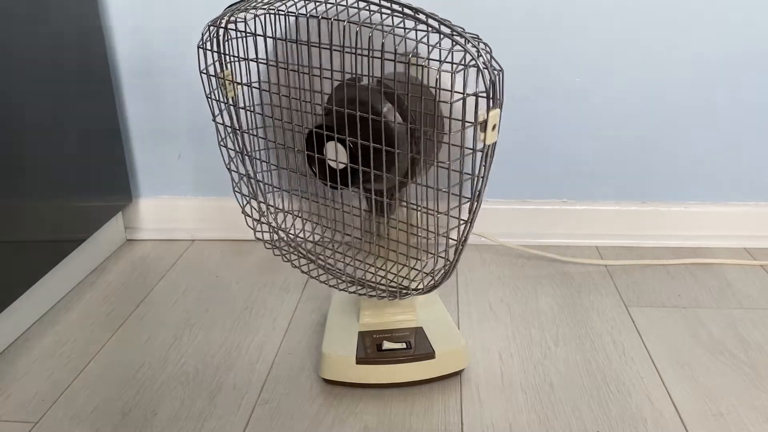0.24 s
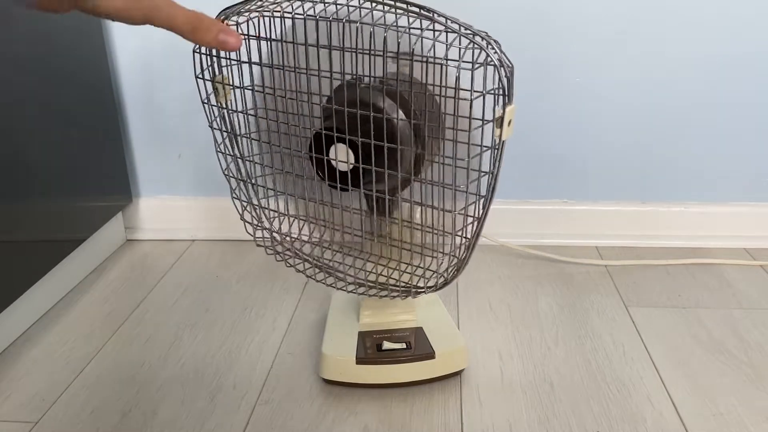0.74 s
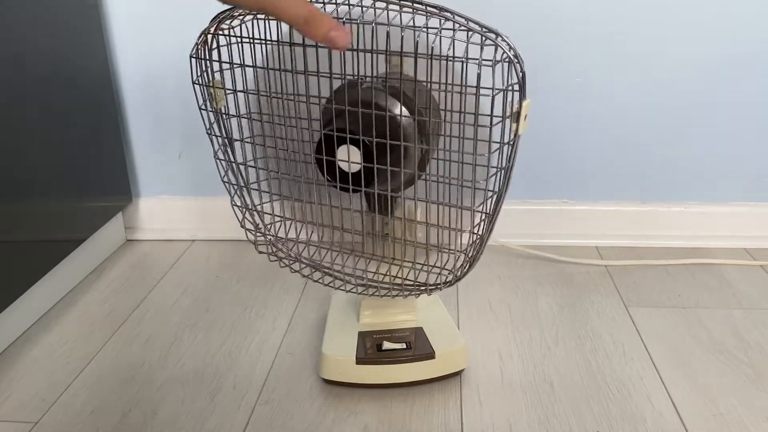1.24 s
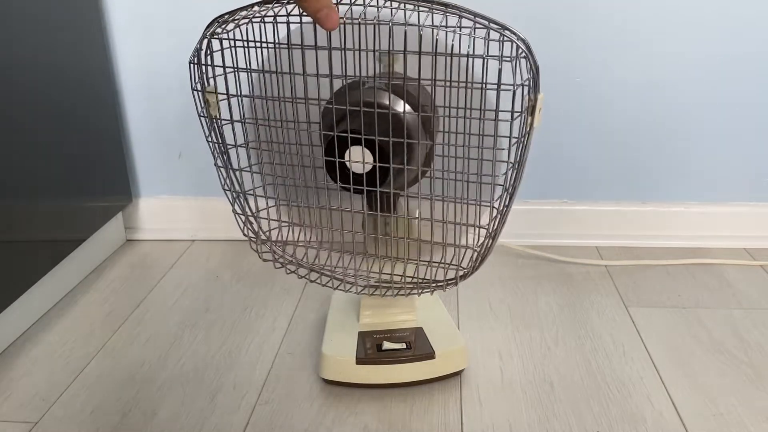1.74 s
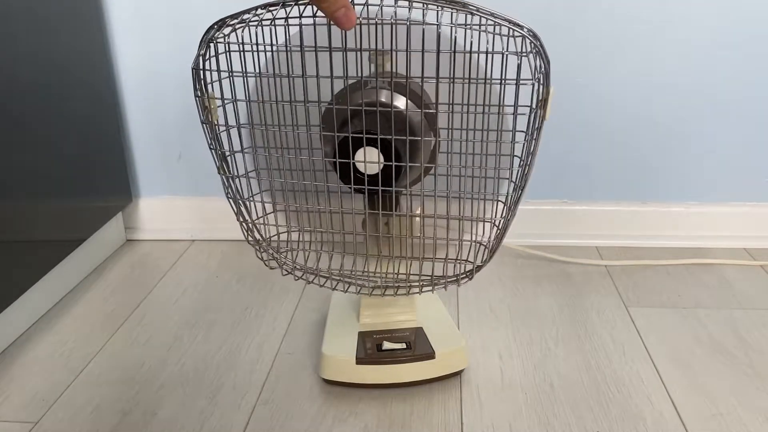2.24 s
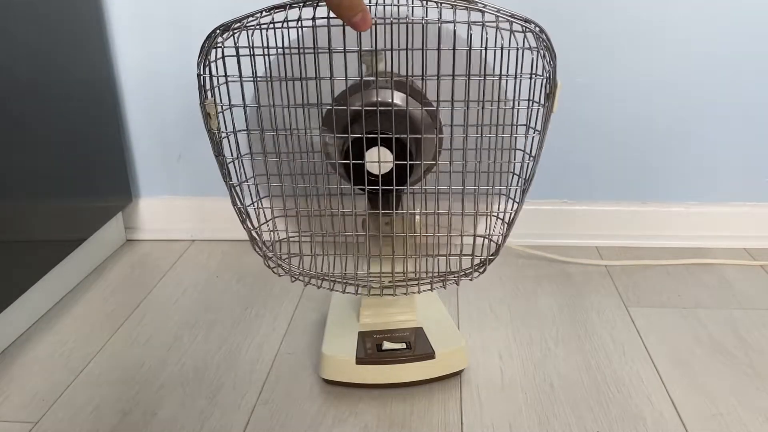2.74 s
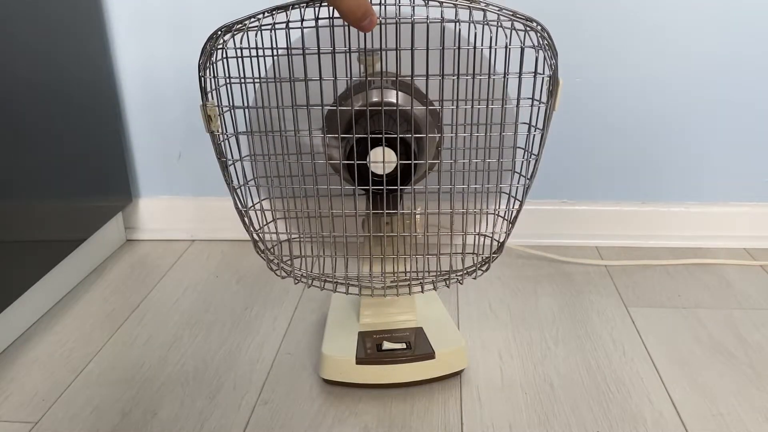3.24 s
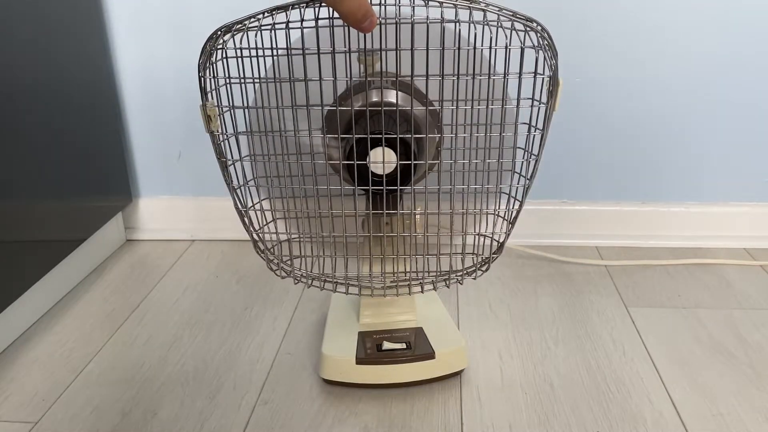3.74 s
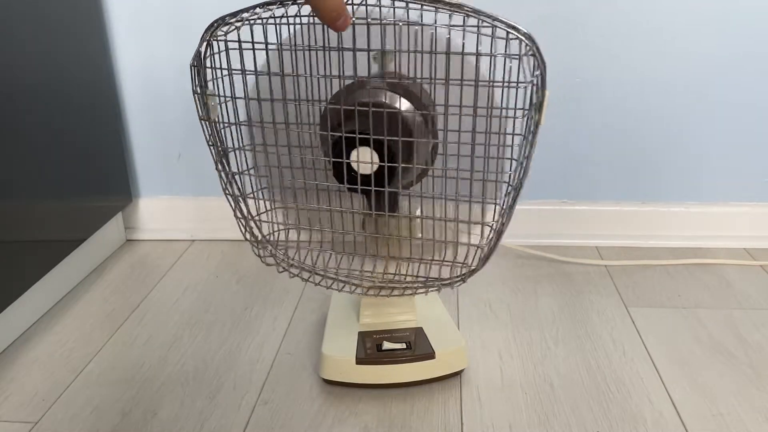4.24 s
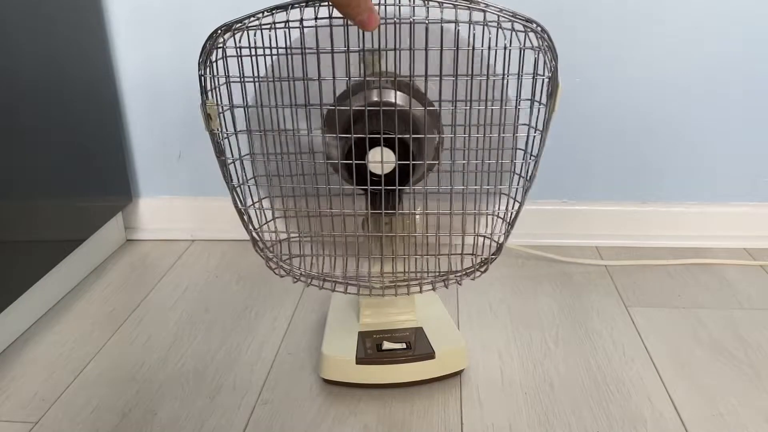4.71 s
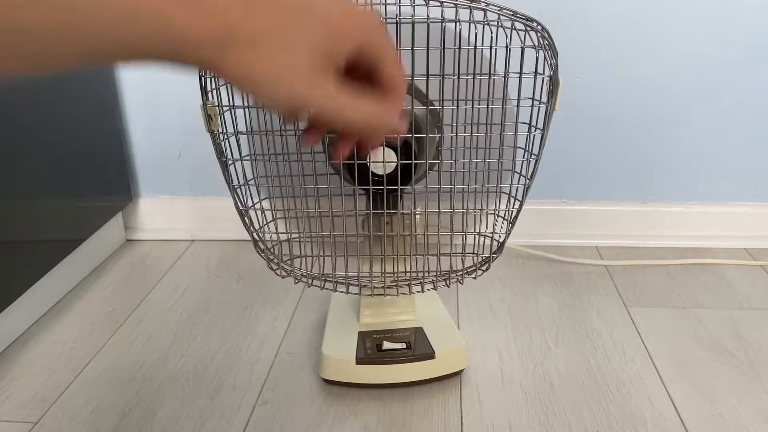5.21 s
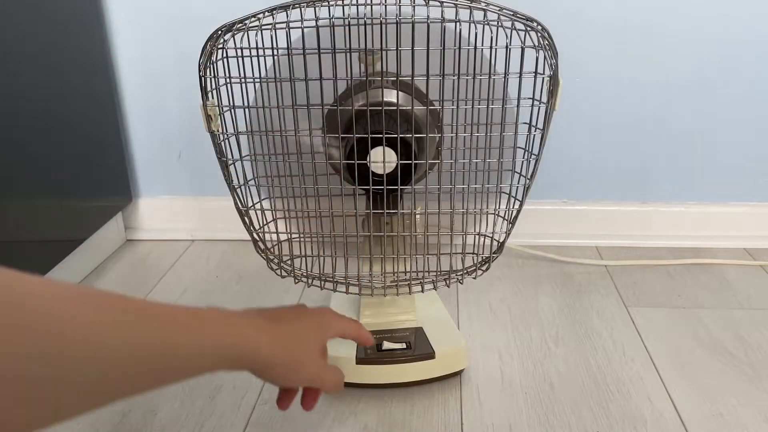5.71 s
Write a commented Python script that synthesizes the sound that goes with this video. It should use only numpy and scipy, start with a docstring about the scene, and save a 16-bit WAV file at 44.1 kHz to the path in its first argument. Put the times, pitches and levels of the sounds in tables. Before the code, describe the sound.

An old electric desk fan runs without stopping for about six seconds, heard close by a stereo phone on a laminate floor in a room. A steady motor hum near 200 Hz, with weaker 100 Hz, sits under a thin whine around 450 Hz that trembles and briefly dips, more raggedly later. Soft, mid-heavy air rush pulses very slightly with the fast blades, about 62 beats a second, and shifts colour as the head turns. Low buffeting grows somewhat after 3 seconds. At 3.4 a deep, dull thump travels through the floor, falling in pitch with a short boomy echo, trailed by weaker bumps until 3.9. A very faint wire-cage tick comes at 3.7, a clearer one at 4.95. Softer thuds follow around 5.1 and 5.45, then a strong, crowded cluster of knocks from 5.74 to 5.94 while the fan keeps running. The fan leans slightly left.

```python
"""An old desk fan runs on a laminate floor in front of a phone with two microphones.
From the start its induction motor hums at mains multiples and whines at its rotor slots, as sums of sines;
three blades beat, filtered noise rushes and buffets, and the head swings to and fro, mostly towards the
front later. Then come soft blows through the floor boards, as thuds that fall in pitch with a scattered
echo, and among them two ticks of the cage, as short coloured noise bursts."""
import sys
import numpy as np
from scipy import signal
from scipy.fft import rfft, irfft, next_fast_len
from scipy.io import wavfile
from scipy.ndimage import uniform_filter1d

SR = 44100
rng = np.random.default_rng(int(sys.argv[2]) if len(sys.argv) > 2 else 0)


def materialize(psi):
    """Save the field psi as 16-bit PCM at rate SR to the path in sys.argv[1].

    A 1-D psi becomes a single channel; in a 2-D psi each row is a channel.
    """
    bounded = np.clip(np.atleast_2d(psi).T, -1, 1)
    quanta = np.round(bounded * 32767).astype(np.int16)
    wavfile.write(sys.argv[1], SR, quanta)


N = 263261
T = np.arange(N) / SR
SIZE = next_fast_len(N + SR)  # transform length, with a second to spare
HZ = np.maximum(np.arange(SIZE // 2 + 1) * SR / SIZE, 1.)
BLADES = 3


def undb(db):
    """Decibel law: 20 dB is a tenfold amplitude."""
    return 10 ** (np.asarray(db) / 20)


def curve(table):
    """Linear interpolation of a table's columns over time."""
    s, *columns = np.transpose(table)
    return [np.interp(T, s, column) for column in columns]


def along(table, column=1):
    """Interpolation of a table's column over the logarithm of frequency."""
    table = np.array(table)
    return np.interp(np.log(HZ), np.log(table[:, 0]), table[:, column])


def between(pair, facing):
    """Linear blend from head turned away to head facing the phone."""
    return pair[0] + (pair[1] - pair[0]) * facing


def walk(rate_hz):
    """Smoothed random modulation: levels held 1 / rate_hz and slewed twice; spread near 1."""
    hold = int(SR / rate_hz)
    steps = np.repeat(rng.standard_normal(N // hold + 1), hold)
    slewed = uniform_filter1d(uniform_filter1d(steps, hold), hold)
    return np.sqrt(2) * slewed[:N]


def tone(turns, db, pan_db, lag):
    """Level and phase difference between microphones: a sine pan_db louder and lag radians ahead at left."""
    left = undb(db + pan_db / 2) * np.sin(2 * np.pi * turns + lag / 2)
    right = undb(db - pan_db / 2) * np.sin(2 * np.pi * turns - lag / 2)
    return np.sqrt(2) * np.array([left, right])  # db is an rms level


# Magnetic hum lines: mains_multiple, shaft_multiple, level_db (relative to the hum level), flutter_db
HUM_LINES = [(2, 0, -11, 1), (4, 0, -0.5, 0.68), (2, -1, -30, 0.5), (2, 1, -19, 2.5), (4, -1, -29.5, 3.5),
             (4, 1, -30, 6.5)]
# Hum level over time: start_s, level_db
HUM_LEVEL = [(0, -41), (2, -38.5), (4.2, -39.5), (5.1, -42), (5.45, -39.5), (5.97, -40)]
# Rotor whine before its fades and flutter: start_s, level_db
WHINE_LEVEL = [(0.0, -52), (0.2, -47), (0.6, -49), (1.9, -47.5), (2.4, -51), (2.84, -47.5), (3.2, -53),
               (3.5, -54), (3.8, -53), (4.16, -52), (4.6, -48.5), (5.15, -49), (5.35, -49), (5.85, -48.5),
               (5.97, -45.5)]
# Short irregular dips in the whine's level: centre_s, depth_db, width_s
WHINE_DIPS = [(2.59, -5.5, 0.028), (2.929, -11.5, 0.048), (3.17, -8, 0.026), (3.425, -10, 0.026),
              (3.895, -11, .015), (4.3, -19, 0.039), (4.68, -8, 0.021), (4.76, -6, 0.016), (4.82, 0, 0.014),
              (5.055, -8, 0.015), (5.255, -1, .02), (4.96, -13, 0.046), (5.14, -17, 0.023),
              (5.32, -5, 0.041), (5.44, -8, 0.038), (5.56, -10, 0.013), (5.71, -6, 0.033),
              (5.8, -19, 0.016), (5.925, -10, 0.012)]
MAINS_HZ, SLOTS = 49.89, 17
WHINE_FADES_DB = (0.5, 2)  # depth of its short fades: turned away, facing


def motor(shaft, facing):
    """Magnetic forces hum with shaft sidebands; slot passing sings alone and above twice the mains."""
    (hum_db,), (whine_db,) = curve(HUM_LEVEL), curve(WHINE_LEVEL)
    hum = 0
    for mains_multiple, shaft_multiple, level_db, flutter_db in HUM_LINES:
        turns = mains_multiple * MAINS_HZ * T + shaft_multiple * shaft + rng.random()
        hum = hum + tone(turns, hum_db + level_db + flutter_db * walk(12), 3.0, 0.069)
    slots = SLOTS * shaft + 0.016 * walk(19) + 0.047 * walk(45)  # the pitch of the whine trembles
    # Squaring makes the short fades deep now and then
    fades_db = between(WHINE_FADES_DB, facing) * (1 - walk(26) ** 2)
    for centre_s, depth_db, width_s in WHINE_DIPS:
        fades_db = fades_db + depth_db * np.exp(-((T - centre_s) / width_s) ** 2)
    flutter_db = 1.63 * walk(22) + 1.8 * walk(50)
    whine = tone(2 * MAINS_HZ * T + slots, whine_db + fades_db + flutter_db, 3.3, -0.16)
    return hum + whine + tone(slots, -67 + 3 * walk(15), 12.0, 2.8)


# Blade overtones: multiple, level_db (before swells, fades and the turn of the head), flutter_db,
# right_lag_rad
BLADE_OVERTONES = [(2, -68, 3, 0.64), (3, -60, 2.5, 0.12), (4, -62, 1, 0.26), (5, -64.5, 2, 0.97)]
# Overtones that come and go: start_s, fourth_multiple_db, fifth_multiple_db
OVERTONE_SWELLS = [(0, -7, 2), (.3, 4, -2), (.6, 1, -2), (.9, 4, -2), (1.15, 2, 0.5), (1.6, -1, 8),
                   (1.85, -9, 3), (2.6, -3.5, -2), (3.05, -1, 6), (3.3, -3, -10), (3.8, -6, 5),
                   (4.2, -4, -5), (4.8, -11, -4), (5.02, -4, 8), (5.2, -7, -4), (5.5, 4, -11),
                   (5.7, -12, 1)]
BEAT_DB, OVERTONES_DB = (-62, -52), (2, -3)  # turned away, facing
OVERTONE_FADES_DB = 3.5


def blades(shaft, facing):
    """Blade passing makes a harmonic series; facing lifts its beat, lowers its overtones; turbulence shakes it."""
    beat_turns = BLADES * shaft + 0.041 * walk(2.5)
    out = tone(beat_turns, between(BEAT_DB, facing) + 3.0 * walk(9), 1.9, 0.094)
    swells_db = [0, 0] + curve(OVERTONE_SWELLS)
    for (multiple, level_db, flutter_db, right_lag), swell_db in zip(BLADE_OVERTONES, swells_db):
        turns = multiple * BLADES * shaft + rng.random() + 0.012 * multiple * walk(15)
        db = level_db + swell_db + between(OVERTONES_DB, facing) + flutter_db * walk(10)
        fades_db = OVERTONE_FADES_DB * (1 - walk(8) ** 2)
        out = out + tone(turns, db + fades_db, 2.3, right_lag)
    return out


# Air noise colour common to both microphones: frequency_hz, relative_density_db (per Hz)
RUSH_MID = [(60, -11.5), (150, 1), (260, 3), (400, 0.5), (1300, -3), (2300, -13), (4500, -18.5),
            (6800, -26), (7500, -32), (7900, -72), (8800, -48), (9300, -34), (11500, -37), (14000, -51)]
# Air noise colour opposite in the two microphones: frequency_hz, relative_density_db (per Hz)
RUSH_SIDE = [(60, -16), (150, -10), (300, -16), (600, -6), (1900, -15.5), (3500, -24.5), (4800, -24.5),
             (5900, -33.5), (7700, -24.5), (10200, -36.5), (10700, -63.5), (12700, -59.5), (13300, -42.5),
             (15500, -48)]
# Share of the opposite part that follows the common part, as the fan stands nearer the left microphone:
# frequency_hz, in_phase_share (fraction), quarter_cycle_ahead_share (fraction)
LEAN = [(60, 0.29, 0.045), (300, 0.28, -.05), (1000, .34, -.05), (2000, 0.36, .25), (3000, 0.47, .45),
        (5000, 0.24, .45), (7500, 0.1, -0.27)]
# Narrow peaks and dips in the air noise, before flutter: centre_hz, width_hz, gain_db,
# facing_db (added to the peak or dip when the head faces the phone)
PEAKS_AND_DIPS = [(517, 81, 2.5, 0), (808, 16, 5.5, -1), (1113, 26, 6, 3), (1277, 45, 5, 4),
                  (1583, 170, 4.5, -3.5), (1750, 110, -7.5, -7.5), (1870, 88, -0.5, 7.5),
                  (2540, 830, 2, 2.5), (1963, 70, 7.5, -5), (2126, 90, 6, 0)]
# Rush level before the blade pulse: start_s, level_db, treble_lift_db
RUSH_LEVEL = [(0, -51.5, 2), (.7, -50.5, 1), (2.2, -50.5, 0.5), (3.2, -51, 1), (4.4, -50.5, 2.5),
              (5.55, -50, -0.5), (5.85, -51.5, 6), (5.97, -50.5, 4.5)]
TREBLE_HZ = 4300


def rush(shaft, facing):
    """Turbulence is broadband noise: half-octave bands, peaks and dips flicker; all pulse with the blades."""
    common, separate = (rfft(rng.standard_normal(SIZE)) for _ in range(2))
    lean = along(LEAN) + 1j * along(LEAN, column=2)
    unshared = np.sqrt(np.clip(1 - np.abs(lean) ** 2, 0, 1))
    mid = common * undb(along(RUSH_MID))
    side = (lean * common + unshared * separate) * undb(along(RUSH_SIDE))
    stereo = np.array([mid + side, mid - side])

    def through(gain):
        """Linear filtering: the air noise shaped by a gain over frequency."""
        return irfft(gain * stereo, SIZE)[:, :N]

    rush_db, treble_db = curve(RUSH_LEVEL)
    out = 0
    for centre_hz in 2 ** np.arange(5, 14.6, 1 / 2):
        band = np.cos(np.pi / 2 * np.clip(2 * np.log2(HZ / centre_hz), -1, 1)) ** 2
        lift_db = treble_db * np.exp(-np.log2(centre_hz / TREBLE_HZ) ** 2)
        flicker_db = 1.0 * walk(13) + 0.58 * walk(4.1)
        out = out + undb(flicker_db + lift_db) * through(band)
    for centre_hz, width_hz, gain_db, facing_db in PEAKS_AND_DIPS:
        # A gain below 0 dB is subtracted, which leaves a dip
        change = (undb(gain_db) - 1) / (1 + (2 * (HZ - centre_hz) / width_hz) ** 2)
        flutter_db = 1.4 * walk(4.5) + 2.8 * walk(19) + 1.6 * walk(60)
        out = out + undb(facing_db * facing + flutter_db) * through(change)
    pulse = 1 + 0.045 * np.sin(2 * np.pi * BLADES * shaft) + 0.026 * np.sin(2 * np.pi * shaft)
    return out * pulse * undb(rush_db) / np.std(out)


# Colour of the low buffeting: frequency_hz, relative_density_db (per Hz)
RUMBLE_COLOUR = [(20, -23), (35, -3.5), (55, 0), (80, 1.5), (130, -4), (200, -19.5), (400, -77.5)]
# Low buffeting level over time, before its flutter: start_s, level_db
RUMBLE_LEVEL = [(0, -60.5), (1, -59.5), (2, -59.5), (3, -55.5), (3.7, -54), (4.3, -57), (5, -54),
                (5.97, -53)]


def draught():
    """Pressure fluctuation: the air stream buffets floor and phone with partly shared low noise."""
    colour = undb(along(RUMBLE_COLOUR))
    both, left, right = (irfft(rfft(rng.standard_normal(SIZE)) * colour, SIZE)[:N] for _ in range(3))
    out = np.array([both + 0.3 * left, both + 0.26 * right])
    (rumble_db,) = curve(RUMBLE_LEVEL)
    return out * undb(rumble_db + 3.1 * walk(10)) / np.std(out)


LOW_SPREAD = 1.42  # the colour of a blow spreads this much wider below its centre
EDGE_HZ = 400


def thud(arrival_s, peak_db, centre_hz, width_octaves, lag_s, edge_db):
    """Group delay: each frequency arrives at arrival_s - lag_s + lag_s * 100 / Hz, high before low."""
    width = width_octaves * np.where(HZ < centre_hz, LOW_SPREAD, 1)
    colour = np.exp(-.5 * (np.log2(HZ / centre_hz) / width) ** 2)
    # The hard edge of the contact
    colour += undb(edge_db) / (1 + (HZ / EDGE_HZ) ** 6) / (1 + (centre_hz / HZ) ** 4)
    turns = HZ * (arrival_s - lag_s) + 100 * lag_s * np.log(HZ / 100)
    wave = -colour * np.exp(-2j * np.pi * turns)
    return wave * undb(peak_db) / np.abs(irfft(wave, SIZE)).max()


# Floor blows before their echo: arrival_s (of 100 Hz), peak_db, centre_hz, width_octaves,
# lag_s (of 100 Hz behind the highest pitches), edge_db (hard edge relative to the thud's colour)
BLOWS = [(3.417, -32, 220, 0.3, 0.004, -25), (3.4241, -31, 420, 0.4, 0.00084, -27),
         (3.4305, -17, 68, 0.94, 0.0088, -34), (3.468, -28, 54.8, 0.36, 0.0078, -30),
         (3.506, -33.5, 52.4, 0.51, 0.0089, -31), (3.543, -36, 71, 0.63, 0.015, -34),
         (3.64, -44.5, 60, 0.5, 0.0083, -32), (3.715, -40, 70, 0.46, 0.013, -31),
         (3.89, -38, 75, 0.34, 0.014, -30), (5.075, -27.5, 78, 0.47, 0.0108, -35),
         (5.102, -32.5, 77, 0.6, 0.0098, -37), (5.137, -26, 84.7, 0.51, 0.0097, -24),
         (5.418, -33, 96.5, .35, 0.014, -42), (5.445, -36, 54.7, 0.31, 0.01, -40),
         (5.503, -36, 80.5, 0.41, 0.011, -30), (5.736, -17, 156, 0.26, 0.0206, -23),
         (5.753, -26.5, 84.4, 0.3, 0.0148, -28), (5.767, -26, 192, 0.4, 0.0106, -15),
         (5.795, -21.5, 70, 0.78, 0.014, -20), (5.818, -28, 60.8, 0.35, 0.01, -35),
         (5.8433, -18.5, 159, 0.36, 0.0127, -34), (5.856, -23.5, 80, 0.4, 0.016, -31),
         (5.873, -28, 55, 0.59, 0.012, -32), (5.906, -31, 129.8, 0.59, 0.012, -35),
         (5.915, -41, 50, 0.5, 0.01, -35), (5.94, -37, 91, 0.34, 0.01, -35)]
BLOW_LAG_S = 0.00018  # a blow reaches the right microphone this much later
ECHO_DB, ECHO_T60_S = -7, 0.54
LINGER_DB, LINGER_T60_S = -14, 2.5  # late part of the echo
BOOM_HZ, BOOM_WIDTH_HZ = 44.2, 76


def floor_blows():
    """The lows of each blow lag its highs, so blows fall in pitch; a scattered echo follows."""
    side_delay = np.exp(1j * np.pi * HZ * BLOW_LAG_S * np.array([[1], [-1]]))
    direct = sum(thud(*blow) for blow in BLOWS) * side_delay
    t = np.arange(SR) / SR
    decay = np.exp(-np.log(1000) * t / ECHO_T60_S)
    decay += undb(LINGER_DB) * np.exp(-np.log(1000) * t / LINGER_T60_S) * (1 - t)
    scatter = rng.standard_normal((3, SR)) * decay * np.minimum(t / 0.012, 1)
    # One shared echo plus a separate one on each side
    scatter = (scatter[0] + 0.5 * scatter[1:]) / np.linalg.norm(scatter[0])
    # The echo is strongest around one low note
    boom = 1 / np.sqrt(1 + (2 * (HZ - BOOM_HZ) / BOOM_WIDTH_HZ) ** 2)
    echo = undb(ECHO_DB) * boom * rfft(scatter, SIZE)
    return irfft(direct * (1 + echo), SIZE)[:, :N]


# Cage ticks: start_s, peak_db (of the part common to both microphones)
TICKS = [(3.688, -48.5), (4.9535, -42.5)]
# Tick colour: frequency_hz, level_db (over the colour of the rush)
TICK_COLOUR = [(1000, -31), (2600, 6), (3300, 12), (5200, 12), (6500, 13), (10000, 15), (12500, 22),
               (15000, 3)]


def ticks():
    """Impulsive excitation: short wire clicks with a small room tail, coloured over the rush's own colour."""
    t = np.arange(SR // 10) / SR
    onset = 1 - np.exp(-t / .0004)
    shape = onset * (np.exp(-(t / .0045) ** 2) + 0.3 * np.exp(-t / .012))
    colour = undb(along(TICK_COLOUR) + np.array([along(RUSH_MID), along(RUSH_SIDE)]))
    out = np.zeros((2, N + SR))
    for start_s, peak_db in TICKS:
        click = rng.standard_normal((2, len(t))) * shape
        mid, side = irfft(rfft(click, SIZE) * colour, SIZE)
        burst = np.roll([mid + .6 * side, mid - .6 * side], int(start_s * SR), axis=1)[:, :N + SR]
        out += burst * undb(peak_db) / np.abs(mid).max()
    return out[:, :N]


# Head, swinging to and fro, and motor, which slows a little while a hand holds the cage:
# start_s, shaft_speed_hz, facing (0 turned away to 1 facing the phone)
HEAD = [(0, 20.76, 0.04), (.9, 20.55, 0), (1.35, 20.87, 0.73), (1.9, 20.7, 0.43), (2.6, 20.76, 0.9),
        (3.0, 20.51, 0.7), (3.6, 20.3, 1), (4.25, 20.57, 0.98), (4.6, 20.94, 0.4), (4.85, 20.79, 1),
        (5.3, 20.93, 0.9), (5.97, 20.74, 0.3)]


def scene():
    """Superposition of fan, floor and cage; one integrated shaft speed drives all rotating parts."""
    shaft_hz, facing = curve(HEAD)
    shaft = np.cumsum(shaft_hz) / SR  # turns
    fan = motor(shaft, facing) + blades(shaft, facing) + rush(shaft, facing) + draught()
    return fan + floor_blows() + ticks()


BASS_HZ, TOP_HZ = 33, 14000


def record(dry):
    """Band limiting: the phone cuts the deep bass and the top."""
    bass_cut = signal.butter(4, BASS_HZ, "high", fs=SR, output="sos")
    top_cut = signal.ellip(8, .2, 70, TOP_HZ, fs=SR, output="sos")
    return signal.sosfilt(top_cut, signal.sosfilt(bass_cut, dry))


dry = scene()
out = record(dry)
materialize(out)
```